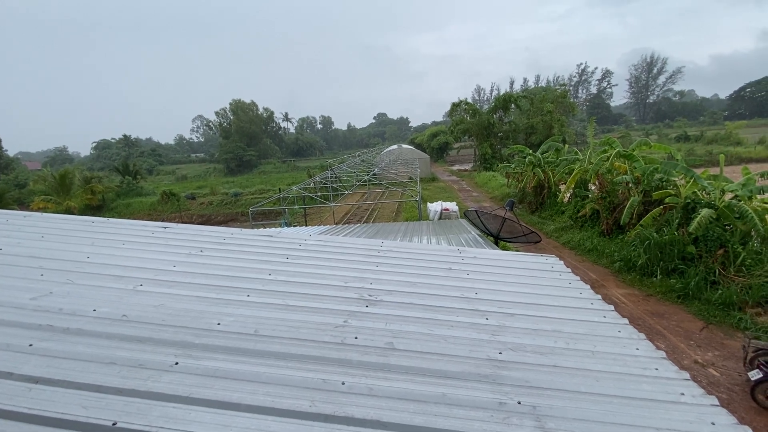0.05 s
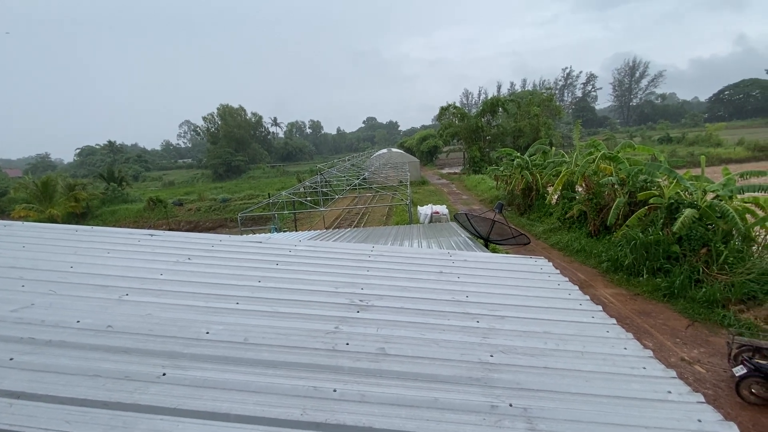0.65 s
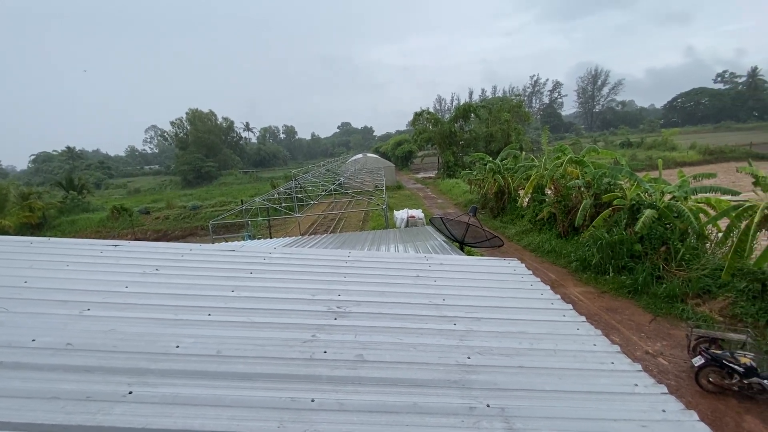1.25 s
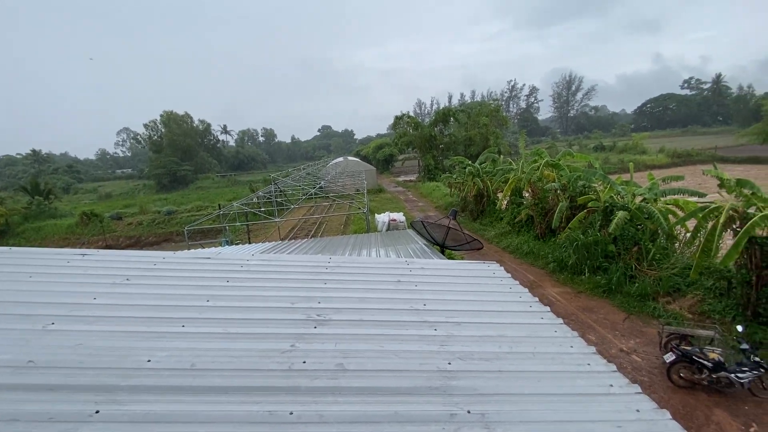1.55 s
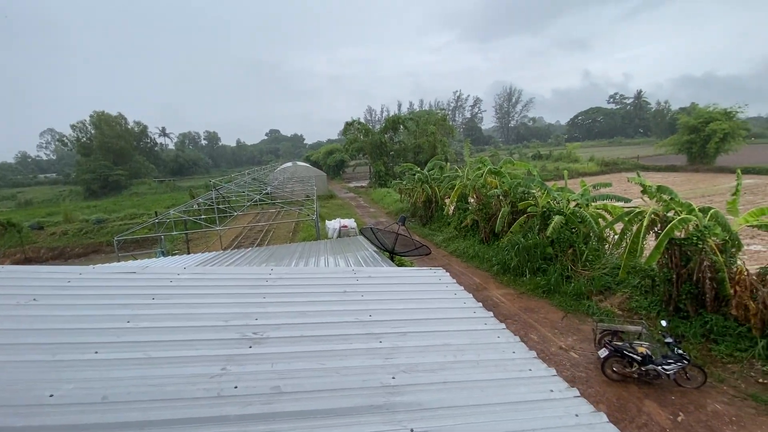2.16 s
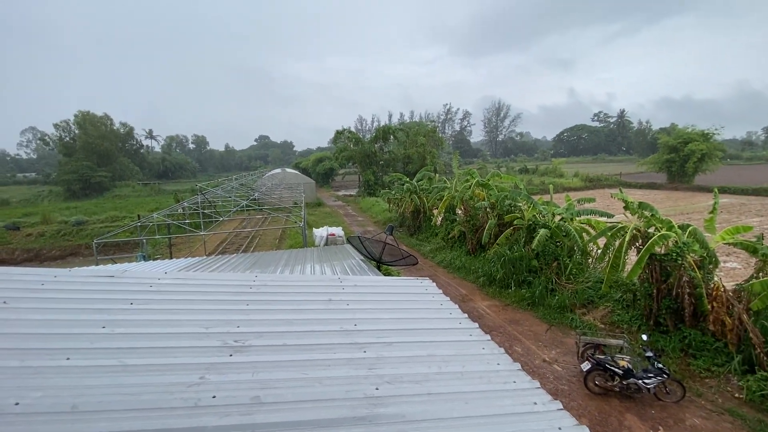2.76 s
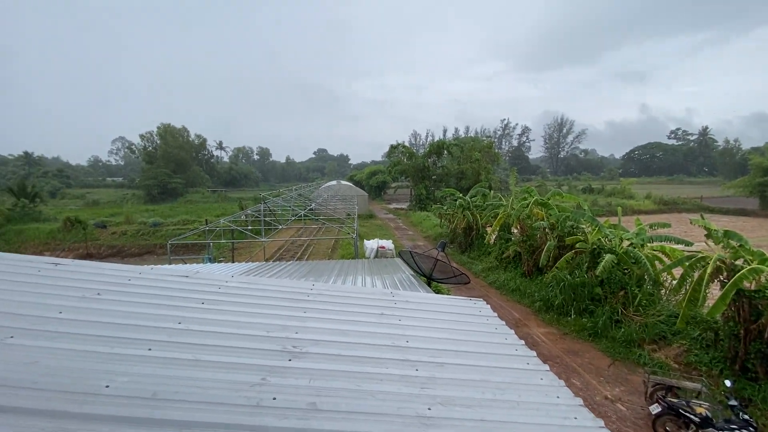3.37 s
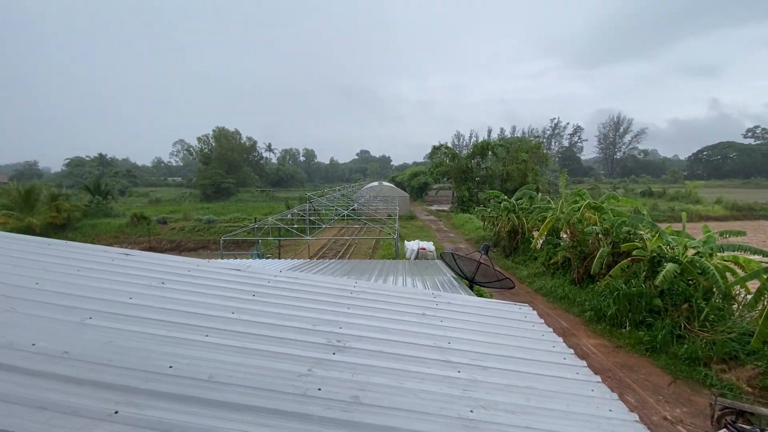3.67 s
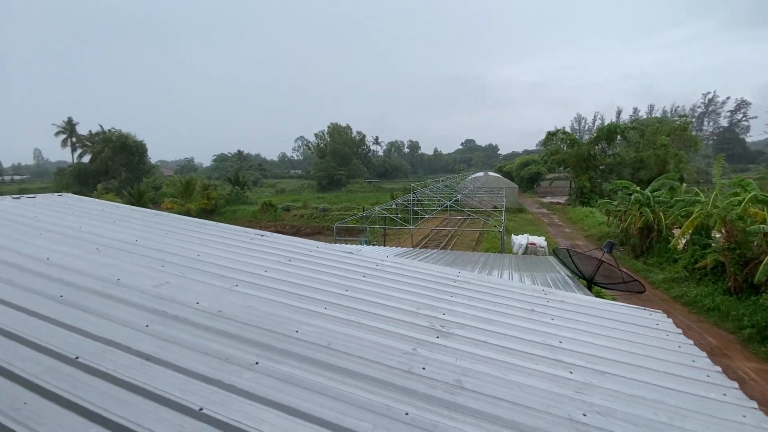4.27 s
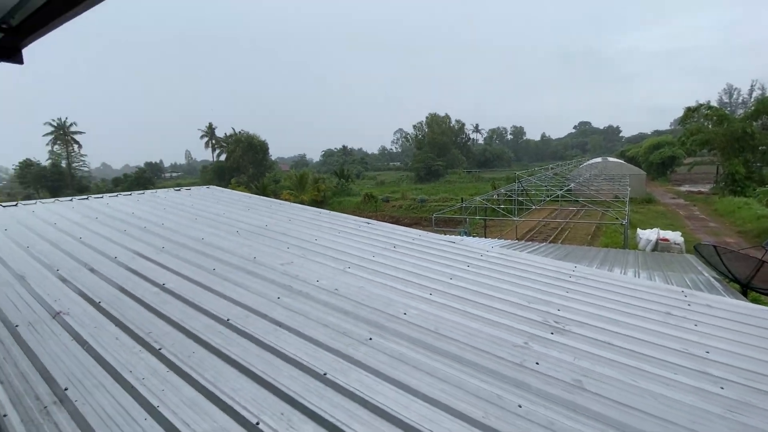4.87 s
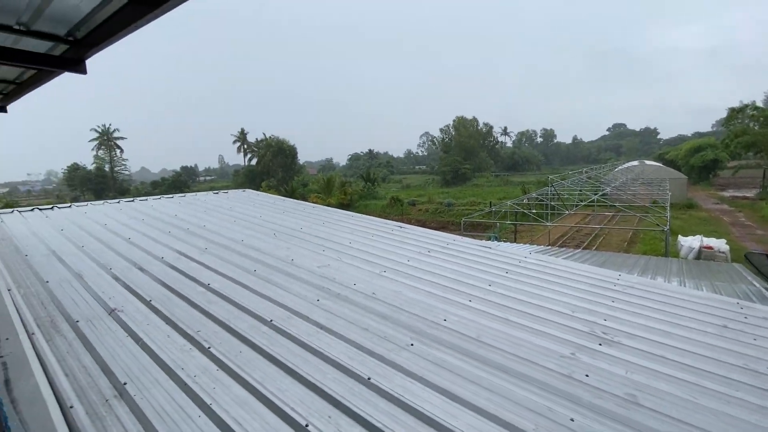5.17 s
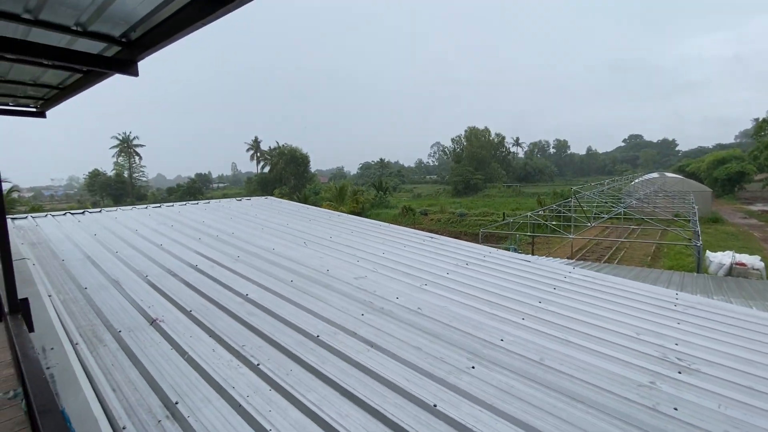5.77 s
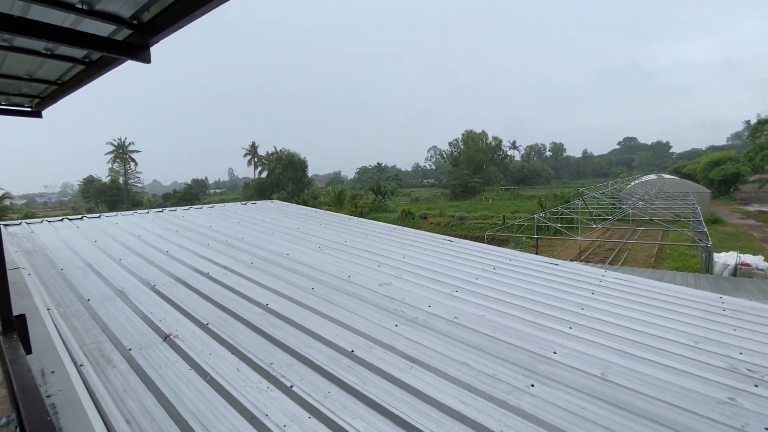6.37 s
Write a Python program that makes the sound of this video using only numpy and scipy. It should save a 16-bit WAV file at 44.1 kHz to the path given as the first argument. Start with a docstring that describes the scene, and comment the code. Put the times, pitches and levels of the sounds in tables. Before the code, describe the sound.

Steady rain falls on a corrugated metal roof for the whole six and a half seconds, heard in stereo from an upper floor above farmland. Far drops merge into an even wash, while nearer ones patter densely on the sheets. Heavy drips land irregularly, several a second, giving hollow thuds, brief clangs and a low boom from the roof; the strongest come at about 0.9, 2.5, 2.8, 3.9, 4.5 and 5.3 seconds. Crisp close ticks are scattered throughout, along with occasional small tinks on nearly the same high note. At about 4.3 seconds one fat drop strikes close by with a sharp metallic ping. Far behind the rain, a faint low engine drone wavers, rising slightly in pitch until about 1.6 seconds and then slowly sinking. The rain keeps almost the same strength to the end.

```python
"""Steady rain washes over a corrugated metal roof, heard from an upper floor above farmland.
Countless drops merge into a hiss, nearer ones patter on the sheets, and an engine drones far away.
Heavy drips from the eaves thud on the panels, clang along the ribs and set the whole roof booming.
Close drops tick on the wet metal or tink on one bright spot; a single fat one lands with a ping."""
import sys
import numpy as np
from scipy import signal
from scipy.fft import rfft, irfft, next_fast_len
from scipy.io import wavfile
from scipy.ndimage import uniform_filter1d

SR = 44100
rng = np.random.default_rng(int(sys.argv[2]) if len(sys.argv) > 2 else 0)


def int16_out(signal):
    """Quantize to a 16-bit WAV file."""
    q = np.round(np.clip(np.atleast_2d(signal).T, -1, 1) * 32767)
    wavfile.write(sys.argv[1], SR, q.astype(np.int16))


N = 283122

# Tone curves. Each row: frequency in Hz, relative level in dB.
WASH_EQ = [(25, -31), (45, -8.5), (110, -5), (300, -4), (410, -3.5), (540, -6), (850, -3), (1200, -7),
           (2220, -7), (3200, -15), (5400, -19), (8800, -26.5), (11800, -31.5), (14500, -84)]  # merged rain on roof and fields
TICK_EQ = [(2000, -15), (4000, -23), (7000, 5), (9000, 1), (11500, -2), (15000, -17)]  # the sizzle of a bursting drop
BODY_EQ = [(500, -19), (1000, -10), (1800, 0.5), (2500, -4), (3100, -6), (4000, -5.5), (5000, -8.5),
           (8000, -26.5)]  # the sheet's answer underneath it
# How hard the rain falls. Each row: time in seconds, gain in dB.
RAIN_RIDE = [(0, -0.6), (.55, 0), (1.15, -1), (1.55, 0.5), (2.4, -1.26), (3.3, -0.44), (3.65, -0.5),
             (4.4, 0), (4.75, -0.5), (5.8, -0.1), (6.42, -0.2)]
# The roof's resonances. Each row: pitch in Hz, relative level in dB, seconds to die away by 60 dB.
PANEL_MODES = [(122.2, -26, 0.023), (160, -7, 0.047), (205.9, -5, 0.1), (248, -5, 0.026),
               (285.5, -2.5, 0.1), (314.7, 0, 0.065), (370.4, -1, 0.059), (406, -5, 0.058)]  # a panel between two ribs
RIB_MODES = [(694, -7.5, 0.1), (784, -2.5, 0.23), (845, -5, 0.13), (904, -3, 0.22), (975, -5.5, 0.14),
             (1040, -6, 0.12), (1130, -1, 0.081), (1252, -1.5, 0.089), (1386, -2.5, 0.076),
             (1536, -4, 0.069), (1674, 0, 0.06)]  # the stiff ribs
SHEET_MODES = [(1697, 5.5, 0.068), (1937, 0.5, 0.12), (2134, 3.5, 0.16), (2270, 3.5, 0.078),
               (2406, 0, 0.11), (2760, -6, 0.021), (3540, -20, 0.075)]  # the bright bare sheet
SPAN_MODES = [(75, 7, 0.51), (82.7, 0.5, 0.24), (68, -3, 0.27), (97, -15, 0.2)]  # the whole roof
TINK_MODES = [(2630, -5, 0.057), (2380, -4, 0.026)]  # one bright spot
PING_MODES = [(324, -9, 0.06), (484, -1, .04), (910, -1, 0.1), (1237, -4, 0.052), (1480, -10, .03),
              (2400, 4, 0.042), (2640, 3, 0.031), (2900, 1, .025), (3110, 5, 0.021), (3940, -8, 0.018),
              (6800, -8, .022), (7500, -9, .018)]  # a stiff spot close by
# The far engine. Each row: time in seconds, firing rate in Hz, then the levels of
# exhaust orders 1, 4 and 5 in dB before the trim.
ENGINE_RIDE = [(0, 42.3, -53, -56, -55), (.22, 42.4, -55, -46, -51), (.45, 42.7, -50, -57, -47),
               (.75, 43.2, -51, -52, -51), (1.25, 44.4, -50, -48, -46), (1.6, 44.9, -50, -48, -48),
               (1.8, 44.4, -53, -53, -48), (1.95, 43.4, -57, -53, -50), (2.15, 43.1, -62, -38.5, -52),
               (2.35, 42.4, -60, -49, -51), (2.55, 41.8, -60, -57, -56), (2.95, 41.3, -59, -53, -55),
               (3.12, 41.3, -58, -46, -52), (3.3, 41.2, -56, -54, -43), (3.5, 41, -58, -56, -52),
               (3.95, 40, -64, -48, -56), (4.28, 39.4, -68, -43, -49), (4.6, 39.2, -65, -55, -55),
               (5.1, 39, -65, -56, -56), (5.55, 38.9, -65, -50, -53), (6.42, 39, -66, -58, -60)]
# The heaviest drips. Each row: start in seconds, thud in dB, thud centre in Hz, trailing droplet
# in dB against the thud, boom in dB before its trim, clang in dB, clang centre in Hz.
HEAVY_DRIPS = [(0.045, -39, 320, -19, -55, -55, 900), (0.175, -41, 300, -1, -54, -36.5, 1400),
               (0.41, -38.5, 230, 0, -53, -50, 900), (0.548, -55, 300, -10, -59, -33.5, 1050),
               (0.61, -41, 205, -6, -56, -47, 900), (0.662, -48, 300, -10, -57, -34.5, 1100),
               (0.85, -31.5, 318, -1, -45.5, -44, 900), (0.912, -39, 298, -7, -49, -40, 800),
               (0.953, -37, 290, -16, -57, -59, 900), (1.103, -34.5, 330, -20, -45, -43, 900),
               (1.302, -37, 290, -8, -46.5, -39, 860), (1.495, -49, 297, -8, -55, -39, 900),
               (1.565, -39, 290, -2, -54, -44, 900), (1.84, -37, 250, -3, -38, -43, 850),
               (1.999, -38.5, 260, 3, -43.5, -41, 850), (2.11, -36, 330, -10, -52, -39, 850),
               (2.497, -31.5, 243, -9, -35, -39, 796), (2.654, -40, 220, -10, -42.5, -58, 900),
               (2.791, -46, 320, -1, -43, -33, 1160), (2.846, -29, 328, -4, -41.5, -43, 750),
               (3.075, -37.5, 330, -8, -55, -52, 900), (3.145, -33, 270, -8, -51, -56, 900),
               (3.177, -35.5, 350, -10, -57, -39, 850), (3.222, -34, 360, -3, -55, -43, 850),
               (3.283, -38.5, 295, -15, -54, -57, 900), (3.32, -41, 205, 1, -43.5, -39.5, 880),
               (3.375, -50, 300, -12, -50, -39.5, 860), (3.7, -41, 300, -5, -43, -54, 900),
               (3.947, -30.5, 330, -15, -41, -45, 850), (4.313, -35, 320, -19, -60, -37, 1300),
               (4.415, -45, 300, -10, -60, -36, 1290), (4.476, -29.5, 310, -3.5, -40, -47, 800),
               (5.083, -32.5, 312, -10, -63, -57, 900), (5.331, -31, 312, -18, -40.5, -39, 750),
               (5.572, -36, 216, -18, -39, -41, 800), (5.727, -35, 252, -3, -49, -45, 850),
               (5.758, -42, 300, -4, -45, -34.5, 950), (5.805, -38, 320, -8, -57, -43, 700),
               (6.275, -37, 300, -12, -59, -50, 900)]
# The closest ticks. Each row: start in seconds, level in dB, body in dB against that level
# (both before their trims), body centre in Hz.
CLOSE_TICKS = [(0.1619, -31.5, -1, 4200), (0.4207, -30.5, 3.5, 3000), (0.549, -33, 7.5, 3400),
               (0.664, -35.5, 8.5, 2000), (0.892, -30.5, 6.5, 3700), (0.928, -29.5, -3, 2800),
               (0.984, -31, 3, 3800), (1.4803, -34, 9.5, 3600), (1.672, -34, -2, 4000),
               (1.81, -32.5, 4.5, 3400), (1.8237, -30.5, -2, 4800), (2.057, -35, -3, 3000),
               (2.1574, -37, -4, 3000), (2.2465, -32, -6, 4500), (2.341, -33, 3, 2600),
               (2.526, -28, 1, 4000), (2.5916, -34, -2, 2600), (2.619, -34, -2, 2700),
               (2.647, -35, 6, 3600), (2.7906, -30.5, 4, 2200), (2.834, -32, -2, 2800),
               (3.163, -33, -3, 4000), (3.203, -31, -2, 1900), (3.741, -31, -12, 4500),
               (3.8108, -28.5, -2, 4400), (3.829, -37, 1, 2700), (3.947, -29, 3, 3700),
               (4.309, -25.5, 3, 2820), (4.422, -34, 3, 1700), (4.908, -33.5, 1, 2600),
               (5.085, -26.5, -1, 3600), (5.2075, -32, -1, 3500), (5.3304, -25.5, -1.5, 2800),
               (5.789, -35, 0, 2700)]
# Drops on the bright spot. Each row: start in seconds, level in dB.
TINK_CUES = [(0.496, -38), (1.247, -37.5), (2.591, -40), (2.798, -37.5), (3.827, -38), (4.905, -38),
             (5.328, -41.5)]
# The fat drop: start in seconds, then ring, crack and chirp levels in dB.
PING_CUE = (4.3098, -25.7, -33, -28.5)
# Its bending wave: first and last pitch in Hz, then glide and decay times in seconds.
PING_CHIRP = (11000, 6600, 0.00146, 0.0064)
# The image at the two microphone ports. Each row: frequency in Hz, then the value named alongside.
PORT_LIKENESS = [(60, .97), (130, .95), (300, .9), (400, .78), (500, .3), (900, .1), (1400, .22),
                 (2000, .47), (2800, .25), (4000, .1), (15000, .25)]  # correlation from 0 to 1
PORT_LEAD = [(60, -.25), (130, -.35), (220, -.7), (300, -1.1), (400, -1.4), (600, -3.6), (1400, -2.7),
             (1900, -2.4), (2400, -1.1), (3000, 1.8), (6000, 2)]  # left's phase lead in radians
PORT_BALANCE = [(60, 1.5), (130, -2), (300, -2.5), (540, -2.5), (760, 0.5), (1200, 0.5), (2100, -2),
                (3000, -0.5), (4200, 4.5), (5200, 6.5), (7000, 3), (9600, -5), (11500, 0)]  # left minus right in dB

# Lighter drips and fainter ticks fall at random, scattered around these base levels.
DRIPS_PER_S, DRIP_SPREAD_DB = 3, 5.5
LIGHT_THUD_DB, LIGHT_BOOM_DB, LIGHT_CLANG_DB = -41, -52.5, -57
LIGHT_THUD_HZ, LIGHT_CLANG_HZ = 297, 900
TICKS_PER_S, TICK_SPREAD_DB = 2.2, 2
FAINT_TICK_DB, FAINT_BODY_DB, FAINT_BODY_HZ = -33, -4, 3000
TRAIL_S, LIGHT_TRAIL_DB = .035, -9.5  # a droplet trails each drip and thuds the panel again


def amp(db):
    """Decibels to gain."""
    return 10 ** (np.asarray(db) / 20)


def unit_rms(x):
    """Scales to an rms of one."""
    return x / np.sqrt(np.mean(x ** 2) + 1e-20)


def curve_at(curve, hz):
    """Reads a curve on a log-frequency axis."""
    knots_hz, value = np.transpose(curve)
    return np.interp(np.log(hz + 1), np.log(knots_hz + 1), value)


def add(mix, s, sound):
    """Lays a stereo sound into the mix at s seconds."""
    part = mix[:, max(round(s * SR), 0):][:, :sound.shape[1]]
    part += sound[:, :part.shape[1]]


def eq(x, curve):
    """Applies a tone curve, keeping the power of white noise."""
    size = next_fast_len(x.shape[-1])
    gain = unit_rms(amp(curve_at(curve, np.fft.rfftfreq(size, 1 / SR))))
    return irfft(rfft(x, size) * gain, size)[..., :x.shape[-1]]


def hump(centre_hz, octave_loss_db=4):
    """A broad bell-shaped tone curve around one pitch."""
    hz = np.geomspace(200, 16000, 30)
    return np.column_stack([hz, -octave_loss_db * np.log2(hz / centre_hz) ** 2])


def drift(points):
    """A slow wander: straight lines through evenly spaced random points."""
    return np.interp(np.arange(N), np.linspace(0, N, points), rng.standard_normal(points))


def swell(gust_db=-0.13):
    """The rain thickens and thins a little, with small chance gusts on top."""
    s, db = np.transpose(RAIN_RIDE)
    return amp(np.interp(np.arange(N) / SR, s, db) + gust_db * drift(30))


def wash(level_db=-32.5, patch_db=1.0, flicker_db=.5):
    """Far drops merge into a hiss whose colour drifts in small patches."""
    frames, hz = N // 256 + 5, np.fft.rfftfreq(1024, 1 / SR)
    real, imag = rng.standard_normal((2, 2, len(hz), frames))
    patches = uniform_filter1d(rng.standard_normal((len(hz), frames)), size=14, axis=0)
    patches = unit_rms(uniform_filter1d(patches, size=12, axis=1))
    flicker = unit_rms(uniform_filter1d(rng.standard_normal(frames), size=16))
    gain = amp(curve_at(WASH_EQ, hz)[:, None] + patch_db * patches + flicker_db * flicker)
    hiss = signal.istft((real + 1j * imag) * gain, nperseg=1024, noverlap=768)[1][:, :N]
    return amp(level_db) * unit_rms(hiss)


def ring(modes, detune, rise_s, samples, weakest=0.19, lag_s=0, dispersion=4):
    """One blow on metal: each spot weights and detunes the modes anew; the lowest comes lag_s late."""
    hz, db, t60 = np.transpose(modes)[:, :, None]
    t = np.arange(samples) / SR
    age = np.maximum(t - lag_s * (hz.min() / hz) ** dispersion, 0)  # low bending waves travel slower
    hz = hz * (1 + detune * rng.standard_normal(hz.shape))
    weight = amp(db) * rng.uniform(weakest, 1, hz.shape)
    phase = 2 * np.pi * rng.random((2, len(modes), 1))
    envelope = weight * (1 - np.exp(-age / rise_s)) * np.exp(-np.log(1000) * age / t60)
    sound = (envelope * np.sin(2 * np.pi * hz * age + phase)).sum(1)
    loud_part = t < .3 * t60.mean()
    return sound / sound[:, loud_part].std(1, keepdims=True)


def splash(decay_s, tail_db, tail_s, tint_db=3.5, rise_s=0.0015, samples=3000):
    """A drop bursts: a brief crackle tinted by the spot it hits, then a weak scatter from the ribs."""
    t = np.arange(samples) / SR
    envelope = (1 - np.exp(-t / rise_s)) * (np.exp(-t / decay_s) + amp(tail_db) * np.exp(-t / tail_s))
    bands_hz = np.geomspace(1000, 16000, 16)
    tint = np.column_stack([bands_hz, tint_db * rng.standard_normal(len(bands_hz))])
    return envelope * eq(rng.standard_normal((2, samples)), tint)


def shower(hits, per_s, spread_db, size_cap):
    """Drops of random size land at random moments, each playing one of the given hits."""
    chance, size, spot = rng.random(N), rng.exponential(1, N), rng.integers(0, len(hits), N)
    out = np.zeros((2, N))
    for i in np.flatnonzero(chance < per_s / SR):
        add(out, i / SR, amp(spread_db * min(size[i], size_cap)) * hits[spot[i]])
    return unit_rms(out)


def patter(panel_db=-46, rib_db=-43.5, sheet_db=-45, body_db=-45, spatter_db=-53):
    """Nearer raindrops ring panels, ribs and bare sheet, and spatter on the wet metal."""
    hits = [ring(PANEL_MODES, detune=0.064, rise_s=0.0032, samples=7000) for _ in range(14)]
    panels = amp(panel_db) * shower(hits, per_s=80, spread_db=2.0, size_cap=0.73)
    hits = [ring(RIB_MODES, detune=0.0391, rise_s=0.00078, samples=6000) for _ in range(20)]
    ribs = amp(rib_db) * shower(hits, per_s=220, spread_db=2.5, size_cap=0.87)
    hits = [ring(SHEET_MODES, detune=0.0297, rise_s=0.0027, samples=3500) for _ in range(24)]
    sheet = amp(sheet_db) * shower(hits, per_s=70, spread_db=3.5, size_cap=2.2)
    hits = [splash(decay_s=0.0067, tail_db=-7, tail_s=0.0084, samples=2200) for _ in range(40)]
    body = amp(body_db) * eq(shower(hits, per_s=320, spread_db=6.0, size_cap=1.9), BODY_EQ)
    spatter = amp(spatter_db) * eq(shower(hits, per_s=750, spread_db=5.7, size_cap=2.0), TICK_EQ)
    return panels + ribs + sheet + body + spatter


def engine(waver=0.01255, flutter=0.35, trim_db=-1):
    """Only a few low exhaust orders carry across the fields; moving air breaks each one up."""
    s, firing_hz, *levels = np.transpose(ENGINE_RIDE)
    t = np.arange(N) / SR
    cycles = np.cumsum(np.interp(t, s, firing_hz) * (1 + waver * drift(60))) / SR
    drone = np.zeros(N)
    for order, db in zip((1, 4, 5), levels):
        air = 1 + flutter * (drift(110) + 1j * drift(110))  # wobbles both level and phase
        tone = np.exp(2j * np.pi * (order * cycles + rng.random()))
        drone += amp(trim_db + np.interp(t, s, db)) * unit_rms((air * tone).real)
    return drone


def strays(per_s, spread_db, count=80):
    """Drops at random moments. Each row: start in seconds, level offset in dB."""
    chance, size = rng.random(count), rng.uniform(-0.71, 1, count)
    times = np.cumsum(-np.log(1 - chance)) / per_s
    return [(s, db) for s, db in zip(times, spread_db * size) if s < N / SR]


def struck(modes, centre_hz, octave_loss_db):
    """Where a drip lands decides which modes it stirs most: those near centre_hz."""
    return [(hz, db - octave_loss_db * np.log2(hz / centre_hz) ** 2, t60) for hz, db, t60 in modes]


def drips(boom_trim_db=-3):
    """Each drip thuds a panel, sends a falling clang along the ribs and slowly swings the whole span."""
    out = np.zeros((2, N))
    light = [(s, LIGHT_THUD_DB + db, LIGHT_THUD_HZ, LIGHT_TRAIL_DB,
              LIGHT_BOOM_DB + db, LIGHT_CLANG_DB + db, LIGHT_CLANG_HZ)
             for s, db in strays(DRIPS_PER_S, DRIP_SPREAD_DB)]
    for s, thud_db, thud_hz, trail_db, boom_db, clang_db, clang_hz in HEAVY_DRIPS + light:
        panel = struck(PANEL_MODES, thud_hz, octave_loss_db=21)
        ribs = struck(RIB_MODES, clang_hz, octave_loss_db=15)
        thud = ring(panel, detune=0.029, rise_s=0.0021, samples=7000, weakest=0.4, lag_s=.055)
        droplet = ring(panel, detune=0.043, rise_s=0.0049, samples=7000)
        boom = ring(SPAN_MODES, detune=0.019, rise_s=0.047, samples=14000)
        clang = ring(ribs, detune=0.02, rise_s=0.0043, samples=8000, weakest=.65, lag_s=.035)
        add(out, s, amp(thud_db) * thud)
        add(out, s + TRAIL_S, amp(thud_db + trail_db) * droplet)
        add(out, s, amp(boom_db + boom_trim_db) * boom)
        add(out, s, amp(clang_db) * clang)
    return out


def ticks(top_trim_db=-4, body_trim_db=-6.5, body_lag_s=0.000997):
    """Close drops: the top end leads the body, as bending waves in the sheet run faster at high pitch."""
    top, body = np.zeros((2, 2, N))
    faint = [(s, FAINT_TICK_DB + db, FAINT_BODY_DB, FAINT_BODY_HZ)
             for s, db in strays(TICKS_PER_S, TICK_SPREAD_DB)]
    for s, db, body_db, centre_hz in CLOSE_TICKS + faint:
        add(top, s, amp(db) * splash(decay_s=0.0042, tail_db=-12.5, tail_s=0.03, tint_db=0.5))
        tap = splash(decay_s=0.003, tail_db=-10.5, tail_s=0.026, tint_db=0)
        add(body, s + body_lag_s, amp(db + body_db) * eq(tap, hump(centre_hz)))
    return amp(top_trim_db) * eq(top, TICK_EQ) + amp(body_trim_db) * eq(body, BODY_EQ)


def tinks():
    """Drops keep finding one bright spot, which answers with nearly the same short note."""
    out = np.zeros((2, N))
    for s, db in TINK_CUES:
        add(out, s, amp(db) * ring(TINK_MODES, detune=0.0076, rise_s=0.001, samples=5000, weakest=.8))
    return out


def ping(crack_s=0.0025, crack_hz=2900, echo_s=.005, echo_db=-7.5, samples=5000):
    """A fat drop hits a stiff spot: a falling chirp, then crack and ring echo off the nearest rib."""
    out = np.zeros((2, N))
    s, ring_db, crack_db, chirp_db = PING_CUE
    first_hz, last_hz, glide_s, decay_s = PING_CHIRP
    t = np.arange(samples) / SR
    cycles = np.cumsum(last_hz + (first_hz - last_hz) * np.exp(-t / glide_s)) / SR
    chirp = np.exp(-t / decay_s) * np.sin(2 * np.pi * (cycles + rng.random((2, 1))))
    add(out, s, amp(chirp_db) * chirp)
    for delay_s, db in ((0, 0), (echo_s, echo_db)):
        crack = np.exp(-t / crack_s) * eq(rng.standard_normal((2, samples)), hump(crack_hz))
        metal = ring(PING_MODES, detune=0.008, rise_s=0.00036, samples=samples, weakest=0.79)
        add(out, s + delay_s, amp(db + crack_db) * crack)
        add(out, s + delay_s, amp(db + ring_db) * metal)
    return out


def mic_ports(pair):
    """Two close ports hear the bass alike and the treble apart; the roof lies to one side."""
    size = next_fast_len(N)
    left, other = rfft(pair, size)
    hz = np.fft.rfftfreq(size, 1 / SR)
    likeness = np.clip(curve_at(PORT_LIKENESS, hz), 0, 1)
    right = likeness * left + np.sqrt(1 - likeness ** 2) * other
    right *= np.exp(-1j * curve_at(PORT_LEAD, hz))
    pan_db = curve_at(PORT_BALANCE, hz) / 2
    panned = np.array([left * amp(pan_db), right * amp(-pan_db)])
    pan_power = np.cosh(pan_db * np.log(10) / 10)
    return irfft(panned / np.sqrt(pan_power), size)[:, :N]


def scene():
    """A bed of rain, single drops on top, and the engine behind it in the centre."""
    bed = swell() * (wash() + patter())
    return mic_ports(bed + drips() + ticks() + tinks() + ping()) + engine()


def record(dry, low_cut_hz=40, high_cut_hz=15800):
    """The microphone's steep low cut, then the band limit."""
    low_cut = signal.butter(N=6, Wn=low_cut_hz, btype="high", fs=SR, output="sos")
    high_cut = signal.firwin(511, high_cut_hz, window=("kaiser", 9), fs=SR)
    return signal.oaconvolve(signal.sosfilt(low_cut, dry), high_cut[None], "same")


dry = scene()
out = record(dry)
int16_out(out)
```